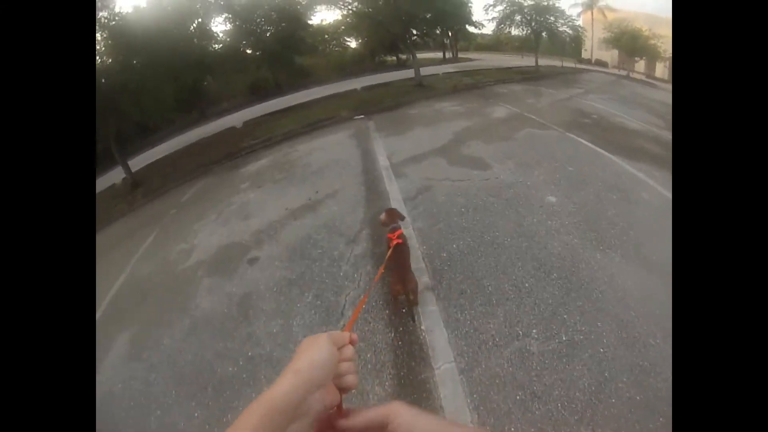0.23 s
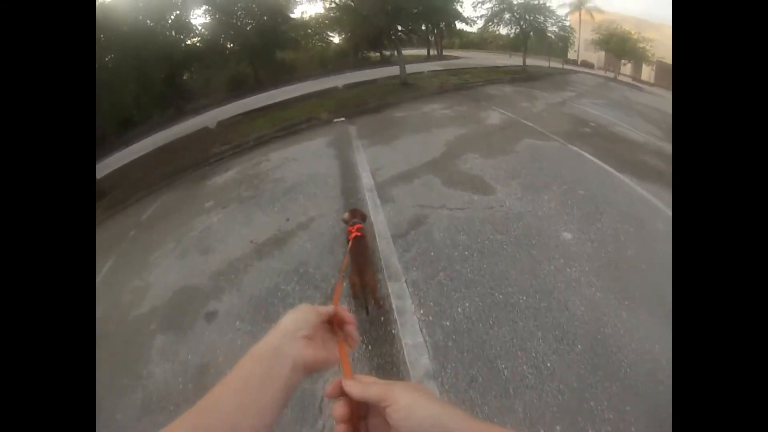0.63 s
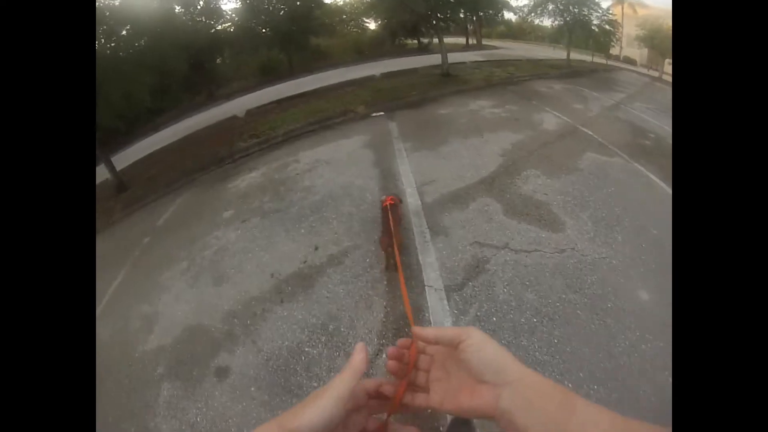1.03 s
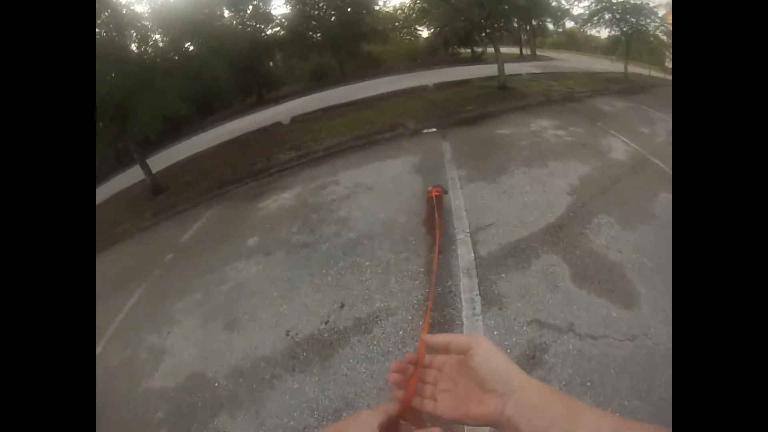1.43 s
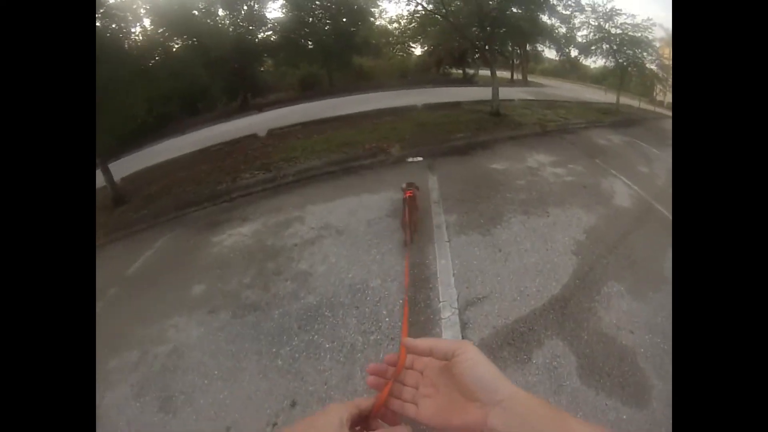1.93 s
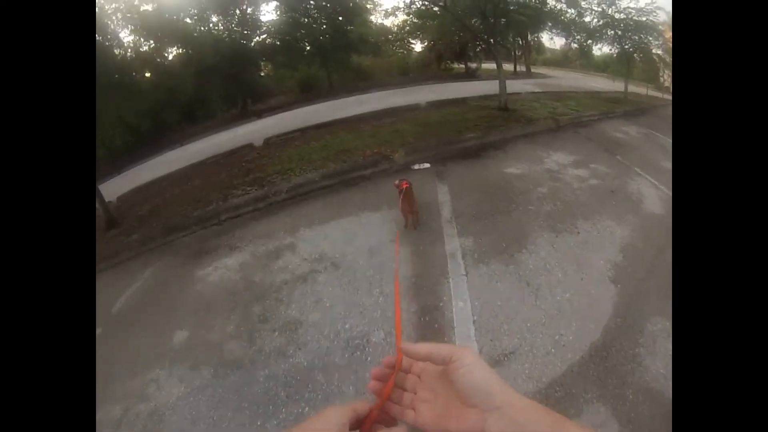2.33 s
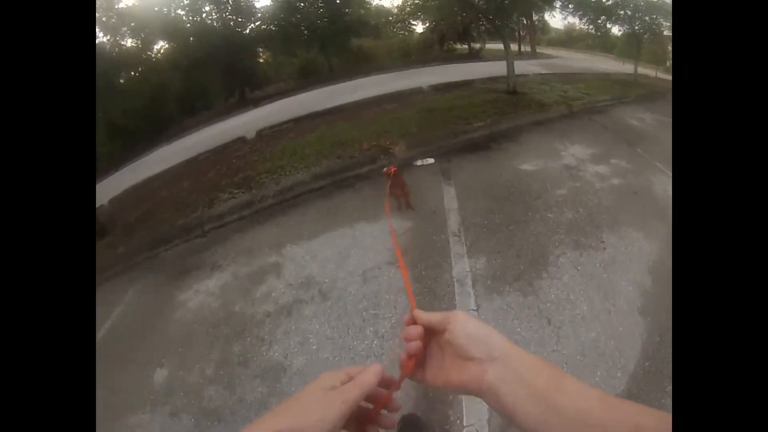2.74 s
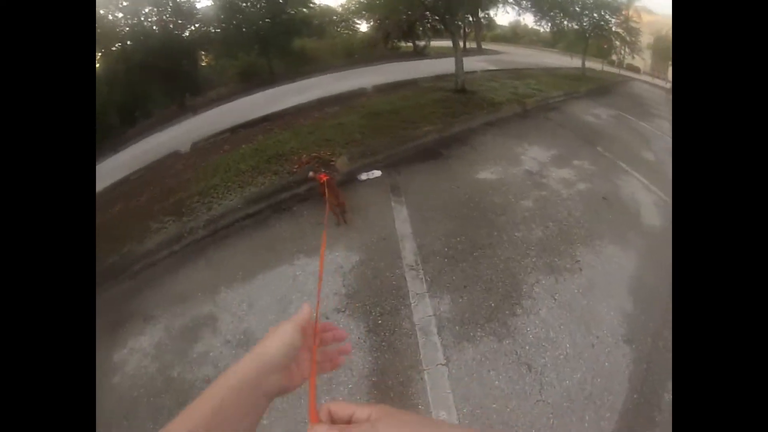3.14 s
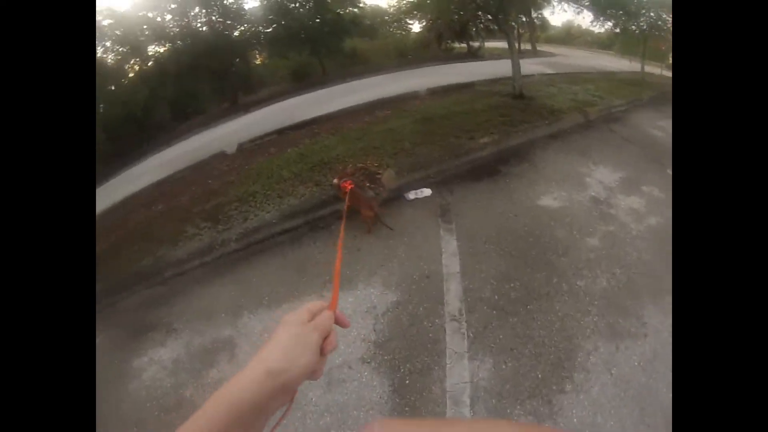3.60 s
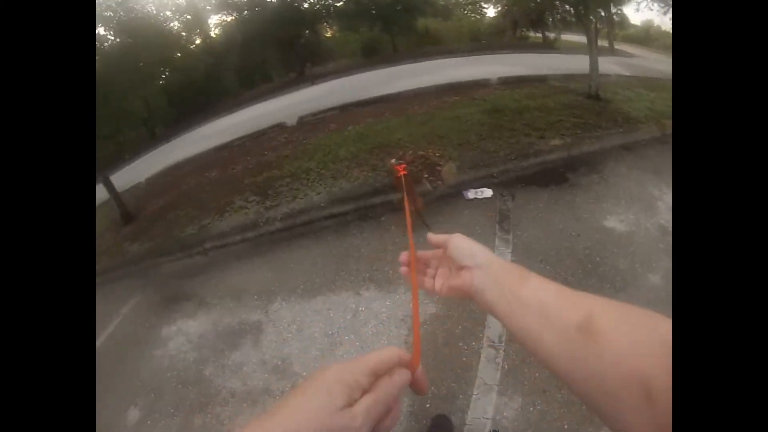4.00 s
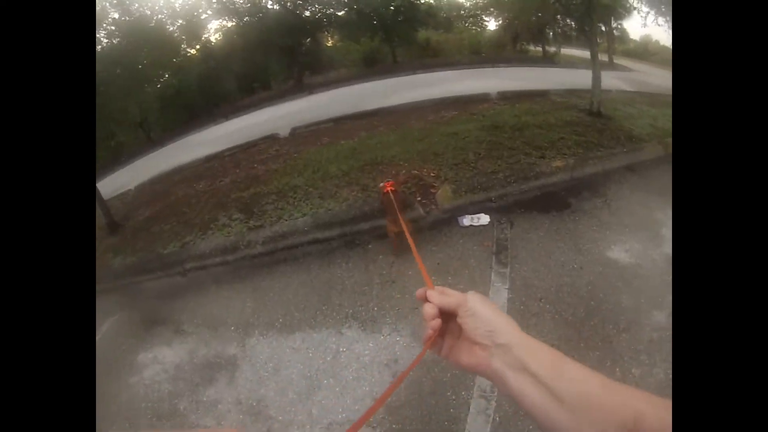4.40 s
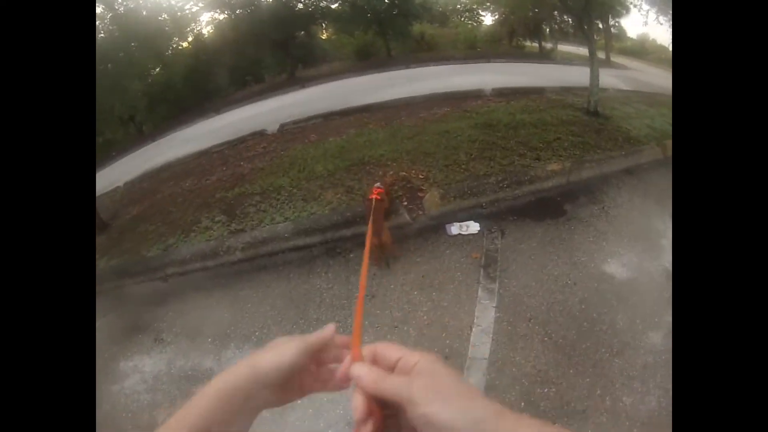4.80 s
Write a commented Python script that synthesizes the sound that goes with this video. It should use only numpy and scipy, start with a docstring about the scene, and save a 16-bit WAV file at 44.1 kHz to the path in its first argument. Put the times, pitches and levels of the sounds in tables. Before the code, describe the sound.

Dull knocks and small plastic clicks of a chest-worn camera mount over soft scuffing steps and rubbing clothes on asphalt, quiet outdoors.

```python
"""Dull knocks and clicks of a chest-worn camera's plastic mount, amid scuffing steps and rubbing clothes:
someone walks a dog on a leash across an asphalt parking lot.
Knocks and clicks are short blows that ring dying tones; scuffs and rubbing are showers of tiny slips.
Slow deep jolts and thin squeaks join in. Behind lie faint outdoor air and a soft rumble on the microphone,
both filtered noise, and a brief far-off drone, a wavering tone."""
import sys
import numpy as np
from scipy import signal
from scipy.fft import rfft, irfft
from scipy.io import wavfile
from scipy.ndimage import uniform_filter1d

SR = 44100
rng = np.random.default_rng(int(sys.argv[2]) if len(sys.argv) > 2 else 0)


def file_out(sig):
    """Save sig as 16-bit WAV at sys.argv[1]."""
    # one column per channel
    cols = np.atleast_2d(sig).T
    # limit, then scale
    lim = np.clip(cols, -1, 1)
    pcm = np.round(lim * 32767).astype(np.int16)
    wavfile.write(sys.argv[1], SR, pcm)


N = 222880
TIME = np.arange(N) / SR  # seconds

# Tones of the plastic housing. Each row: pitch in Hz, typical relative level in dB,
# time to die away by 60 dB in seconds.
HOUSING_MODES = [(1110, 2.5, 0.024), (1145, 12.5, 0.021), (1531, 2, 0.043), (1808, 10.5, 0.024),
                 (2100, -3, 0.0097), (2230, 7.5, 0.029), (3220, 3, 0.0059), (3510, 0.5, 0.026),
                 (4190, 0.5, 0.0097), (4600, -2, 0.017)]


def amp(db):
    """Turns decibels into a plain gain."""
    return 10 ** (np.asarray(db) / 20)


def unit(x):
    """Scales a sound to an rms (average strength) of 1."""
    return x / np.sqrt(np.mean(x ** 2) + 1e-20)


def add(mix, s, sound):
    """Lays a sound into the mix, starting at s seconds."""
    start = max(round(s * SR), 0)
    part = mix[start:][:len(sound)]
    part += sound[:len(part)]


def shaped(x, points):
    """Filters x along a curve of (Hz, dB), with causal phase so that clicks keep their attack."""
    hz, db = np.transpose(points)
    f = abs(np.fft.fftfreq(N, 1 / SR))
    gain_db = np.interp(np.log(f + 1), np.log(hz), db)
    log_gain = np.log(amp(gain_db))
    response = np.exp(np.conj(signal.hilbert(log_gain)))
    return irfft(rfft(x) * response[:N // 2 + 1], N)


def colour(x, points):
    """Gives x a spectrum, then scales it to rms 1."""
    return unit(shaped(x, points))


def grains(per_s, spread_db):
    """Tiny slips at random moments, rms 1; a wider spread gives many small ones and a few large."""
    size = amp(spread_db * np.minimum(rng.exponential(1, N), 4))
    sign = rng.choice([-1, 1], N)
    happens = rng.random(N) < per_s / SR
    return unit(size * sign * happens)


def ring(modes, t):
    """Dying tones of a struck body; each call weighs them anew, as blows land a little elsewhere."""
    total = np.zeros(len(t))
    for hz, db, t60 in modes:
        fading_db = db + rng.standard_normal() - 60 * t / t60
        total += amp(fading_db) * np.sin(2 * np.pi * hz * t)
    return total


def thud(t, hz, cycles):
    """A soft, heavily damped push whose envelope peaks at 1 after the given cycles."""
    u = t * hz / cycles
    return u ** 2 * np.exp(2 - 2 * u) * np.sin(2 * np.pi * hz * t)


def knocks():
    """The mount bumps against the chest, then rings and rattles for a moment."""
    # Dull knocks. Each row: start in seconds, peak level in dB before the final filter, pitch in Hz.
    knock_rows = [(0.1761, -36.5, 254), (0.2353, -33, 388), (0.3683, -16.5, 302), (.622, -36, 360),
                  (0.73, -29.5, 280), (0.7822, -14.5, 329), (.794, -22.5, 308), (0.802, -25.5, 249),
                  (0.8566, -21.5, 342), (0.894, -30.5, 234), (1.271, -26, 304), (1.2818, -22, 290),
                  (1.29, -25, 230), (1.313, -30, 310), (1.7187, -28.5, 258), (1.8232, -29, 322),
                  (1.8376, -23.5, 370), (1.8822, -24.5, 346), (2.06, -28, 380), (2.18, -43, 332),
                  (2.1917, -33.5, 440), (2.214, -37, 268), (2.97, -23, 266), (2.9781, -29.5, 450),
                  (3.0052, -30, 387), (3.772, -40, 436), (3.832, -14.5, 300), (3.878, -37, 260),
                  (3.9554, -12.5, 301), (3.9652, -28, 219), (4.084, -25, 288), (4.352, -38, 340),
                  (4.439, -37.5, 360), (4.595, -28, 297), (4.967, -33.5, 360)]
    # Low tones of the mount. Each row: pitch in Hz, typical relative level in dB,
    # time to die away by 60 dB in seconds.
    mount_modes = [(210, -19, 0.06), (305, -16, 0.016), (593, -19.5, 0.019), (670, -15.5, 0.029),
                   (1130, -38, 0.007)]
    # How the mount passes a knock on to the microphone. Each row: frequency in Hz, gain in dB.
    mount_filter = [(60, 3.5), (190, 1), (260, -2), (360, 1), (460, -2.5), (600, 6.5), (760, -6.5),
                    (900, -6), (1120, 0), (1600, -4), (3000, -17)]
    rise_s, rattle_s, rattle_db = 0.0046, 0.0037, -29
    hard_db, usual_hz = 15, 340  # ringing gains this many dB for each octave above the usual pitch
    out, t = np.zeros(N), TIME[:SR // 8]
    for s, db, hz in knock_rows:
        rattle = amp(rattle_db) * np.exp(-t / rattle_s) * rng.standard_normal(len(t))
        contact = (t == 0) + rattle  # one sharp hit plus the rattle
        soft_start = 1 - np.exp(-(t / rise_s) ** 2)
        ringing = signal.fftconvolve(contact, soft_start * ring(mount_modes, t))[:len(t)]
        ring_gain = amp(hard_db * np.log2(hz / usual_hz))  # quicker blows ring more
        blow = thud(t, hz, cycles=0.59) + ring_gain * ringing
        add(out, s, amp(db) * blow / abs(blow).max())
    return shaped(out, mount_filter)


def clicks():
    """Plastic meets plastic: a short crack and a chattering contact ring the housing."""
    # Hard contacts. Each row: start in seconds, peak level in dB,
    # brightness as the upper edge of a gentle filter in Hz.
    click_rows = [(.027, -42, 8100), (.273, -38.5, 5100), (0.3676, -33.5, 4500), (.387, -37.5, 3000),
                  (0.6125, -30.5, 3400), (0.781, -34, 2500), (0.8561, -37.5, 3500), (1.3127, -39, 3500),
                  (1.405, -41.5, 1416), (1.838, -40, 1200), (2.0607, -49, 900), (2.19, -46, 915),
                  (2.887, -44, 3000), (2.9782, -38.5, 700), (3.833, -30, 1700), (3.9548, -21.5, 5260),
                  (4.0857, -33, 6960), (4.352, -41, 2600), (4.5878, -43.5, 800), (4.8045, -39, 1190),
                  (4.967, -39.5, 1300)]
    crack_s, crack_db, crack_hz = 0.0013, -2, 2500
    chatter_s, chatter_db = 0.01, -29
    crack_filter = signal.butter(1, crack_hz, "highpass", fs=SR)
    bass_cut = signal.butter(2, 600, "highpass", fs=SR)
    out, t = np.zeros(N), TIME[:SR // 8]
    for s, db, edge_hz in click_rows:
        hiss, chatter = rng.standard_normal((2, len(t)))
        crack = signal.lfilter(*crack_filter, np.exp(-t / crack_s) * hiss)
        contact = (t == 0) + amp(chatter_db) * np.exp(-t / chatter_s) * chatter
        ringing = signal.fftconvolve(contact, ring(HOUSING_MODES, t))[:len(t)]
        tick = ringing + amp(crack_db) * crack
        tick = signal.lfilter(*bass_cut, tick)  # a small shell gives little bass
        tick = signal.lfilter(*signal.butter(1, edge_hz, fs=SR), tick)  # softer contacts are duller
        add(out, s, amp(db) * tick / abs(tick).max())
    return out


def jolts():
    """Heavy footfalls and tugs shake the whole camera: deep, damped bumps."""
    # Deep bumps. Each row: start in seconds, level of the envelope's peak in dB, pitch in Hz.
    jolt_rows = [(1.422, -27.5, 49.7), (4.212, -36, 93), (4.26, -40, 114), (4.338, -39, 70),
                 (4.598, -43, 114)]
    out = np.zeros(N)
    for s, db, hz in jolt_rows:
        add(out, s, -amp(db) * thud(TIME[:SR // 5], hz, cycles=0.39))
    return out


def stroke(s, swell, fade):
    """A movement's strength: swells to 1 at s seconds, then fades."""
    return np.exp(np.minimum((TIME - s) / swell, (s - TIME) / fade))


def walking():
    """Strength of rubbing and of grit over time, from heel, sole and leg swish, and pulls on the leash."""
    # Footsteps: heel, then sole, then the other leg swishes past. Each row: heel time in seconds,
    # then the strengths in dB of heel rub, sole rub, heel grit and swish.
    step_rows = [(.272, -46.5, -38.5, -55.5, -49.5), (0.787, -38, -44, -51, -51),
                 (1.277, -34.5, -43, -53, -49.5), (1.786, -41.5, -49.5, -57.5, -65),
                 (2.41, -52, -45.5, -63.5, -62), (2.95, -40, -47, -58, -49.5), (4.27, -46, -62, -60.5, -53),
                 (4.99, -45, -55, -59, -55)]
    # Sleeves rub as the hands take up the leash. Each row: peak time in seconds,
    # swell and fade in seconds (one number for both), strength in dB.
    pull_rows = [(3.36, 0.032, -51.5), (3.53, 0.037, -53), (3.89, 0.12, -47.5), (4.05, 0.041, -48),
                 (4.64, 0.034, -49.5), (4.859, 0.04, -50)]
    roll_s, swell_s, fade_s = 0.1, 0.037, 0.035  # the sole follows the heel after roll_s
    swish_s, swish_width_s = 0.23, 0.058  # delay after the heel; swell and fade
    sole_grit_db, grit_per_db = -4, 0.45  # sole grit: offset from the heel's, rise per dB of harder landing
    leg_hiss_db, sleeve_hiss_db = -14.5, -22  # fine hiss, relative to the rubbing
    rub = [np.full(N, amp(-61.5))]  # clothes never keep quite still
    grit = []
    for s, heel_db, sole_db, grit_db, swish_db in step_rows:
        heel = stroke(s, swell_s, fade_s)
        sole = stroke(s + roll_s, swell_s, fade_s)
        swish = amp(swish_db) * stroke(s + swish_s, swish_width_s, swish_width_s)
        sole_db_of_grit = grit_db + sole_grit_db + grit_per_db * (sole_db - heel_db)
        rub += [amp(heel_db) * heel, amp(sole_db) * sole, swish]
        grit += [amp(grit_db) * heel, amp(sole_db_of_grit) * sole, amp(leg_hiss_db) * swish]
    for s, width, db in pull_rows:
        sleeve = amp(db) * stroke(s, width, width)
        rub.append(sleeve)
        grit.append(amp(sleeve_hiss_db) * sleeve)
    # unrelated noises add by power, so take the root of the summed squares
    return np.linalg.norm(rub, axis=0), np.linalg.norm(grit, axis=0)


def scuffs(strength):
    """Soles drag grit over the asphalt in clumps; rubbing in the same stroke makes the housing ring."""
    # Tone of grit under the soles. Each row: frequency in Hz, relative level in dB per Hz.
    grit_tone = [(400, -23), (850, -7), (1120, 11), (1400, -0.5), (1850, 4), (2050, 1.5), (2350, 10.5),
                 (2800, -2), (4900, -3), (6000, -15.5), (8500, -16), (15000, -37)]
    clump_s, clump_db = 0.012, 2.2  # spacing and spread of the random ups and downs
    grit = colour(grains(per_s=3000, spread_db=0.0), grit_tone)
    ringing = ring(HOUSING_MODES, TIME[:SR // 8])
    housing = unit(signal.oaconvolve(grains(per_s=500, spread_db=8.5), ringing)[:N])
    wander = np.interp(TIME / clump_s, np.arange(N), rng.standard_normal(N))
    clumps = unit(amp(clump_db * wander))
    return strength * clumps * (amp(0.5) * grit + amp(-5) * housing)


def rubbing(strength):
    """Clothes and strap stick and slip, heard through the mount."""
    # Tone of rubbing cloth. Each row: frequency in Hz, relative level in dB per Hz.
    cloth_tone = [(40, -31), (110, -4), (200, 0), (330, 1), (450, -7), (570, -4), (750, -19.5), (1100, -19),
                  (1500, -37.5), (4000, -52)]
    return strength * colour(grains(per_s=1100, spread_db=1.57), cloth_tone)


def squeaks():
    """Short slips that sing in one narrow band."""
    # Faint thin squeaks. Each row: middle in seconds, length in seconds, pitch in Hz,
    # band width in Hz, level in dB (rms before the swell and fade).
    squeak_rows = [(0.61, 0.13, 1250, 160, -59), (1.077, 0.021, 3370, 700, -60.5),
                   (4.789, .07, 1150, 350, -59)]
    out = np.zeros(N)
    for s, length, hz, width, db in squeak_rows:
        band = signal.butter(2, [hz - width / 2, hz + width / 2], "bandpass", fs=SR, output="sos")
        noise = rng.standard_normal(round(length * SR))
        slip = unit(signal.sosfilt(band, noise))
        add(out, s - length / 2, amp(db) * slip * np.hanning(len(slip)))
    return out


def outdoors():
    """Steady far hiss, and air pushing on the microphone as a low rumble."""
    # Tone of the hiss. Each row: frequency in Hz, relative level in dB.
    air_tone = [(30, 15.5), (100, 16), (300, 1.5), (700, -7.5), (1100, -7.5), (1600, -9), (2400, -9),
                (3200, -13.5), (5000, -16.5), (9000, -23.5), (13500, -26.5), (15000, -26)]
    # Tone of the rumble. Each row: frequency in Hz, relative level in dB.
    rumble_tone = [(10, 5.5), (28, -4.5), (60, -5), (100, -4.5), (170, -12.5), (400, -50.5), (1000, -76)]
    # The rumble's rise and fall. Each row: time in seconds, level in dB before the trim below.
    rumble_curve = [(0, -49.5), (.35, -51.5), (.52, -52), (.64, -48), (.86, -39), (1.05, -55), (1.24, -50),
                    (1.33, -50), (1.43, -41), (1.54, -62), (2.8, -60), (2.97, -41), (3.15, -61.5),
                    (4.1, -64), (4.3, -61), (4.72, -59.5), (4.92, -47.5), (5.05, -63)]
    trim_db = -1
    air = amp(-53.5) * colour(rng.standard_normal(N), air_tone)
    rumble_gain = amp(trim_db + np.interp(TIME, *np.transpose(rumble_curve)))
    return air + rumble_gain * colour(rng.standard_normal(N), rumble_tone)


def drone():
    """A far-off, slightly wavering tone swells, holds and fades."""
    pitch_hz, waver_hz = 96.7, 2.2
    hold_start_s, hold_end_s, rise_s, fade_s = 2.95, 3.306, 0.13, 0.13
    waver = unit(uniform_filter1d(rng.standard_normal(N), size=6000))  # noise smoothed over 6000 samples
    hz = pitch_hz + waver_hz * waver
    tone = unit(np.sin(2 * np.pi * np.cumsum(hz) / SR))
    outside = np.maximum((hold_start_s - TIME) / rise_s, (TIME - hold_end_s) / fade_s)
    return amp(-51.5) * np.exp(-np.maximum(outside, 0)) * tone


def scene():
    """All sources at the one microphone."""
    rub, grit = walking()
    camera = knocks() + clicks() + jolts()
    walker = scuffs(grit) + rubbing(rub) + squeaks()
    return (camera + walker + outdoors() + drone())[None]


def record(dry):
    """The recorder's band limit: nearly nothing passes above its upper edge."""
    taps = signal.firwin(511, 15350, window=("kaiser", 8), fs=SR)  # edge in Hz
    return signal.oaconvolve(dry, taps[None], "same")


dry = scene()
out = record(dry)
file_out(out)
```